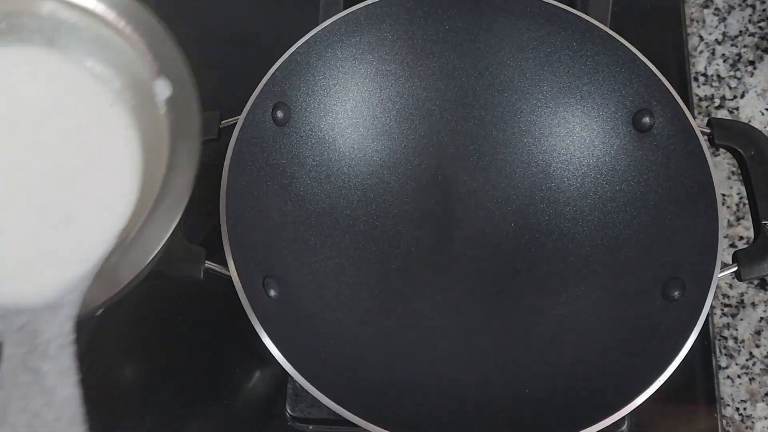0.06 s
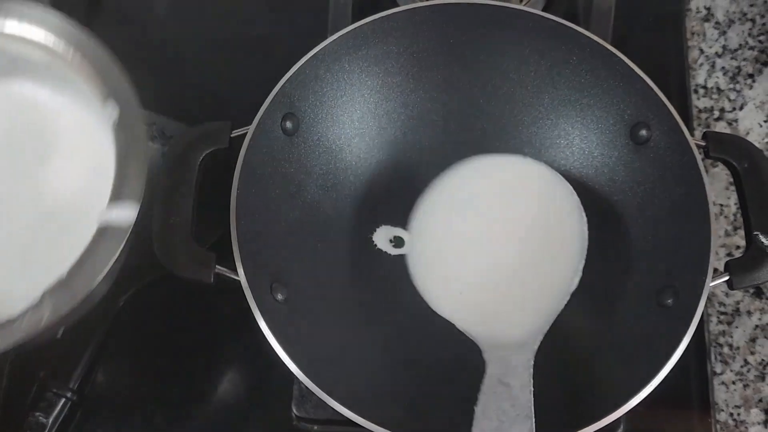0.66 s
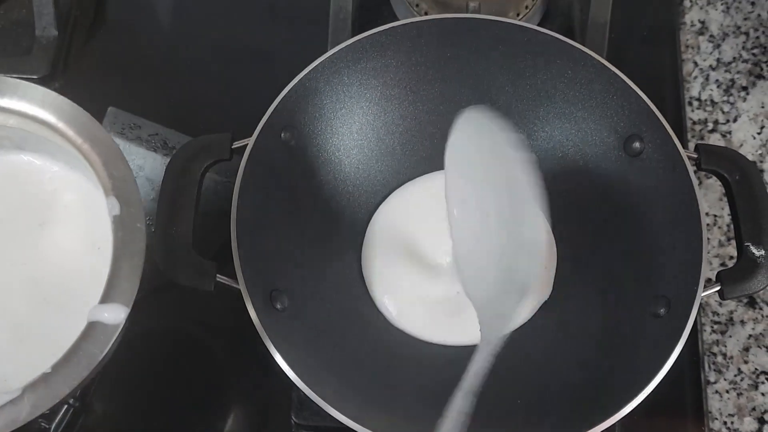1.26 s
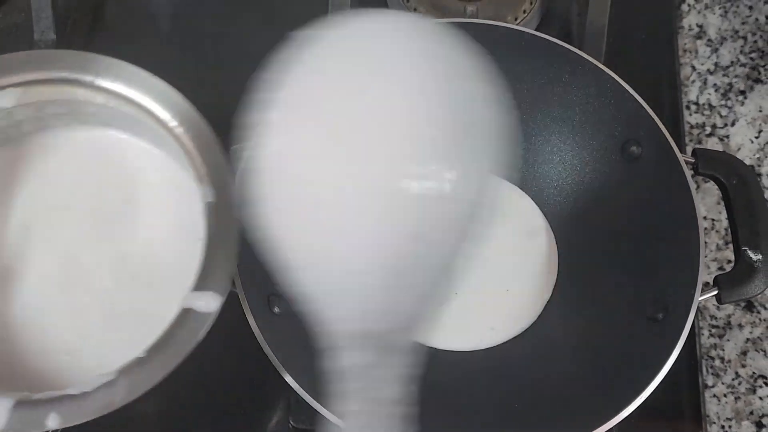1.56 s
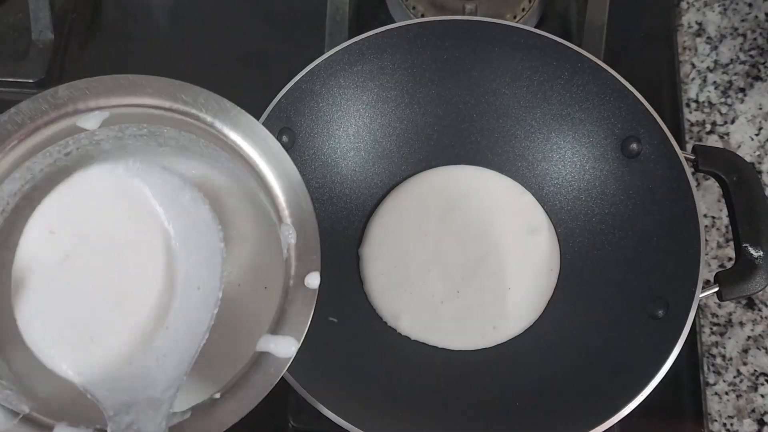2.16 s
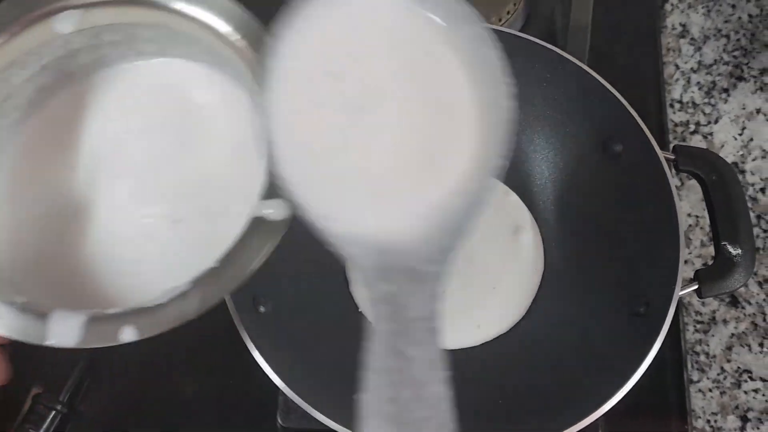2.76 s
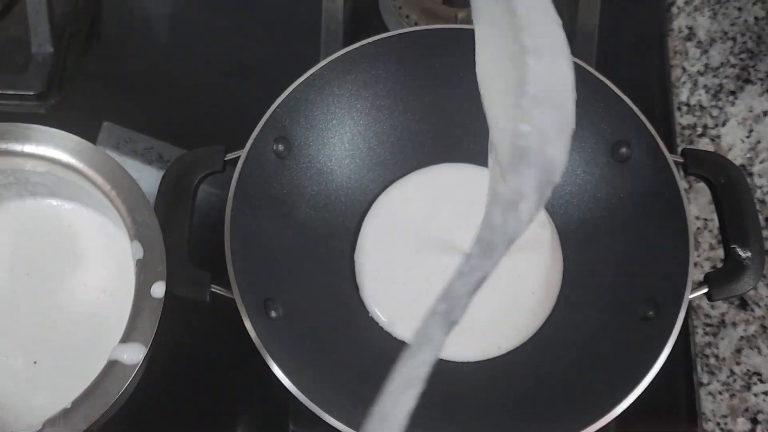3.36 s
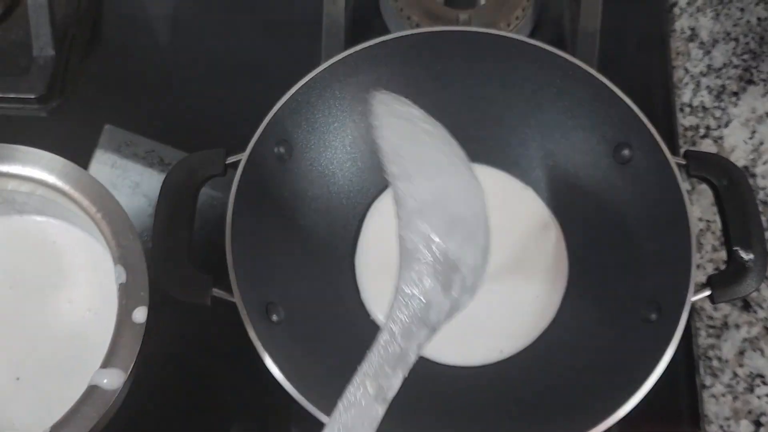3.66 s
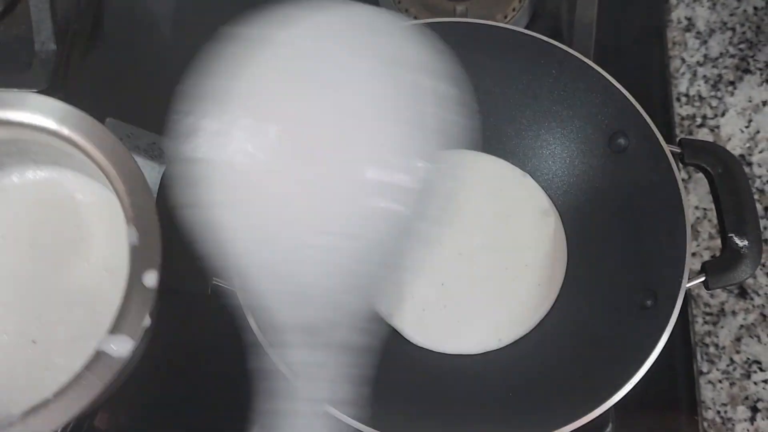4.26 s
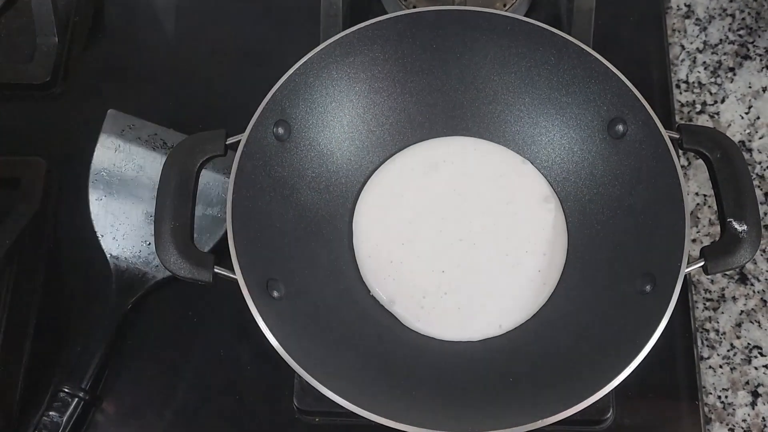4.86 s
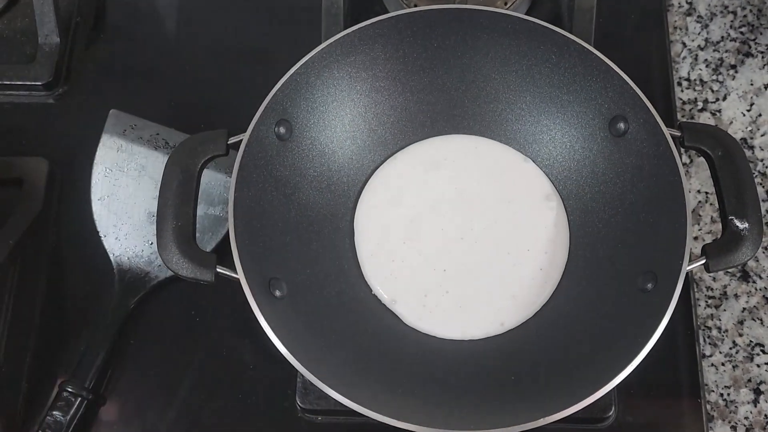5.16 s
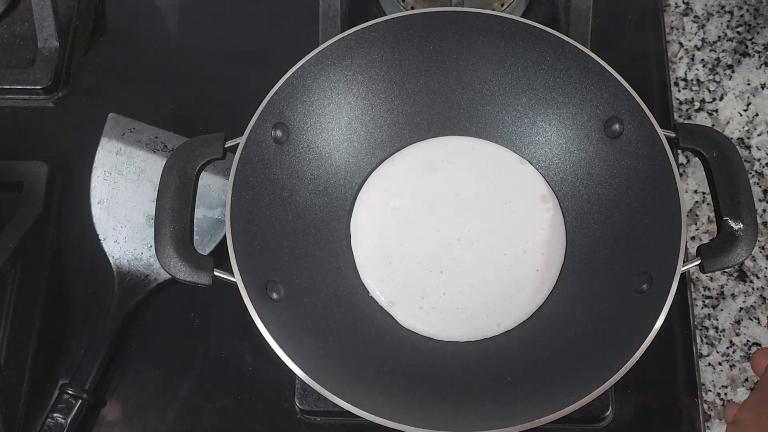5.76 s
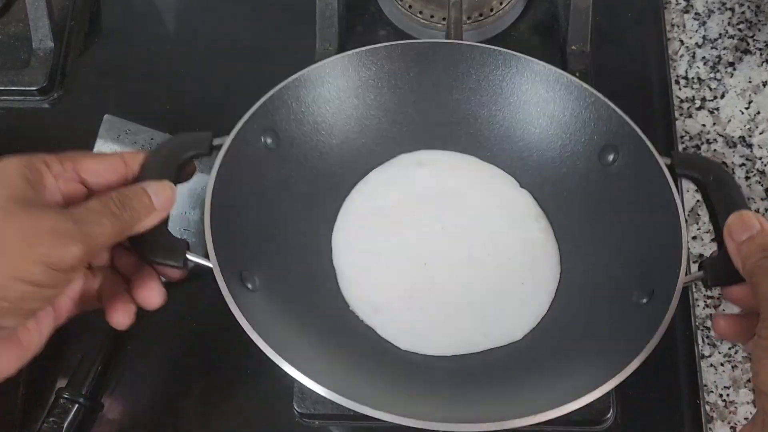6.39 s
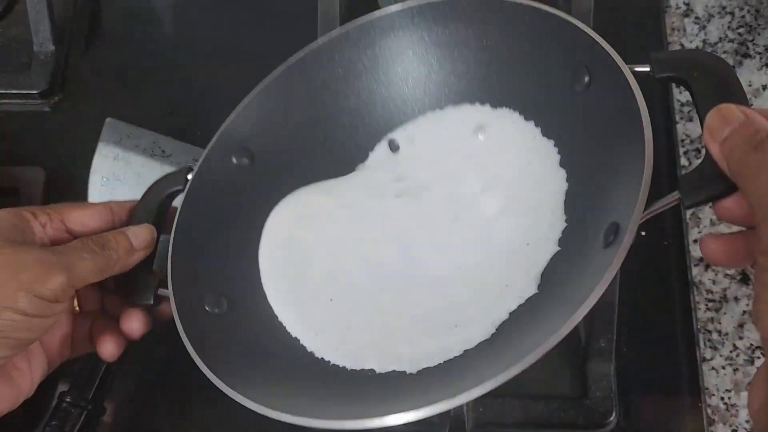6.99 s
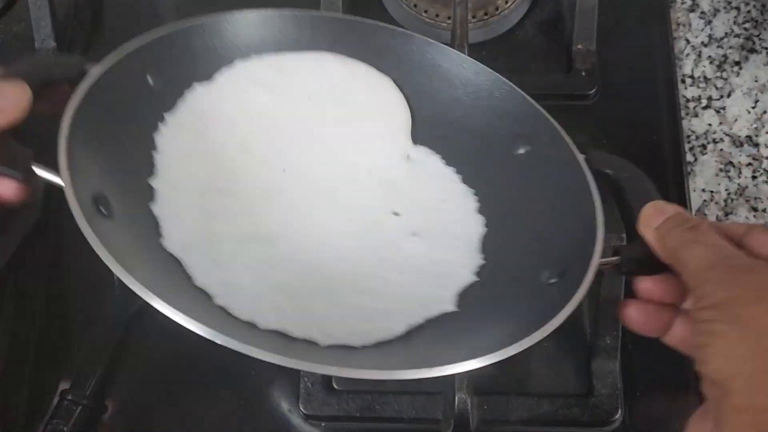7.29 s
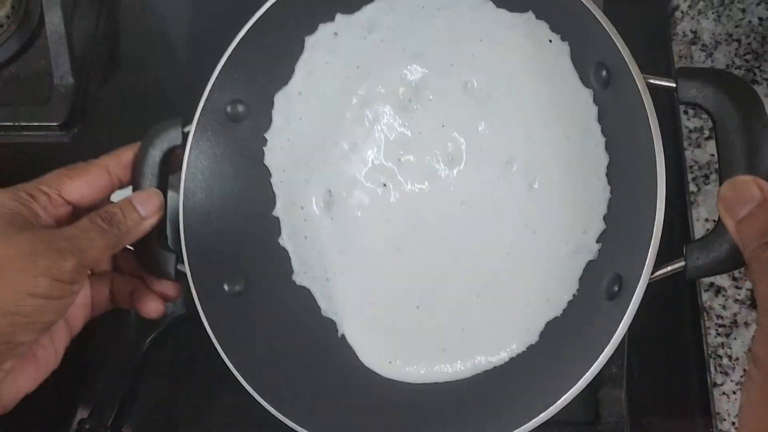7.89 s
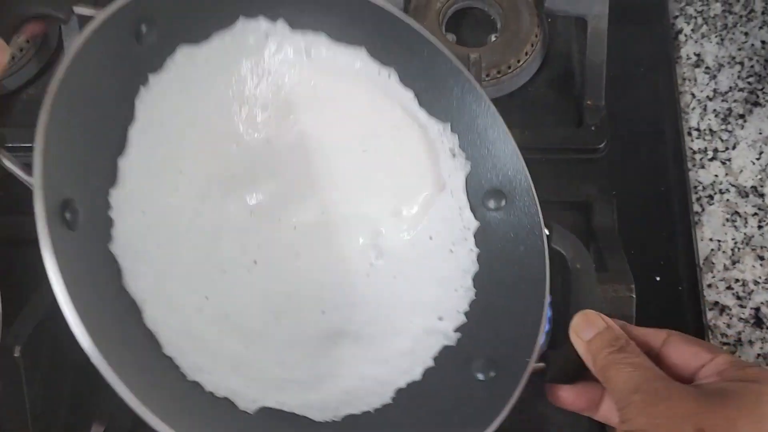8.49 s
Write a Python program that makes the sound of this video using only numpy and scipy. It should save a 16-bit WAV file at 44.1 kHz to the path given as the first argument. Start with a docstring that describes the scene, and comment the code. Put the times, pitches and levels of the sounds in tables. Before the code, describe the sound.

Batter sizzles as it is ladled twice into a hot pan and swirled, with a few pot knocks in between.

```python
"""Batter in a hot pan

Batter is ladled in twice, then swirled round. Each time it meets hot metal it boils, fine bubbles
first and larger ones later, and dies down as the underside sets. In between, single bubbles crackle
and the batter pot knocks on the counter, grit ticking under it. Handling bumps the stove top;
a gas burner murmurs underneath. A small kitchen, heard from just above the pan."""
import sys
import numpy as np
from scipy import signal
from scipy.fft import rfft, irfft, next_fast_len
from scipy.io import wavfile
from scipy.ndimage import uniform_filter1d, map_coordinates

SR = 44100
rng = np.random.default_rng(int(sys.argv[2]) if len(sys.argv) > 2 else 0)


def wav_out(sig):
    """Save sig, one row per channel (or a flat mono array), as 16-bit PCM at SR to the path in sys.argv[1]."""
    wavfile.write(sys.argv[1], SR, np.round(np.clip(np.atleast_2d(sig).T, -1, 1) * 32767).astype(np.int16))


N = 376173


# Bursting bubbles, one spectrum per size: freq_hz, density_db
FIZZ_SPECTRUM = [(5290, -29.5), (9000, -10), (9960, -9.5), (11700, 4.5), (13600, 0), (15100, 10.5),
                 (16000, -11)]
CRACKLE_SPECTRUM = [(1530, -31.5), (2600, -8.5), (3370, -1), (4000, 0), (5820, -7), (6290, -4.5),
                    (6800, -6), (7540, -1), (9000, -9), (11700, -13), (19800, -120)]
LARGE_SPECTRUM = [(800, -24), (980, -3.5), (1130, 5), (1230, 5), (1340, 2), (1440, -0.5), (1600, 4),
                  (1800, 3.5), (2000, 3.5), (2300, 6), (2600, -14), (2900, -15.5)]
GURGLE_SPECTRUM = [(250, -18), (400, -13.5), (550, -7.5), (670, -3), (760, -6), (850, -0.5), (980, -12),
                   (1150, -14.5)]
# Position of the wet edge: time_s, left_right_db
WET_EDGE = [(0.6, -5), (2.6, -7), (3.1, -4), (3.74, -6.5), (4.7, -5.5), (5.3, -11), (6.28, -4.5),
            (7.35, -5.5), (7.84, -5)]

def sizzle():
    """Fierce boiling merges bursts into a hiss; as the batter sets, single ones stand out."""
    boil, gurgle = boiling()
    bubbles = bursts(rate_per_s=200 + 24000 * boil / boil.max(), scatter_db=3)
    sputter_db = 0.7 * wobble(40) + 0.55 * wobble(9)
    fierce_db = 20 * np.log10(boil + 1e-5) + 33.5  # fiercer boiling is brighter
    fizz_db = grown_db(boil, delay_s=0.0017, growth_s=0.001) + 2.75 + 0.12 * fierce_db
    crackle_db = grown_db(boil, delay_s=0.00067, growth_s=0.0069) - 0.22
    large_db = grown_db(boil, delay_s=0.0033, growth_s=0.041) - 14
    gurgle_db = grown_db(gurgle, delay_s=0.096, growth_s=0.052) + 0.89

    def layer(spectrum, level_db, steam):
        """One bubble size: bursts over escaping steam."""
        gain = amp(level_db + sputter_db + 0.88 * wobble(18))
        return gain * spread(bubbles + steam * noise(), spectrum)

    hiss = (layer(FIZZ_SPECTRUM, fizz_db, steam=1.0)
            + layer(CRACKLE_SPECTRUM, crackle_db, steam=1.62)
            + layer(LARGE_SPECTRUM, large_db, steam=0.88)
            + layer(GURGLE_SPECTRUM, gurgle_db, steam=1.37))
    lean_db, = curves(WET_EDGE)
    return pan_ring(hiss + swells()) * balance(lean_db - lean_db.mean())


# Ladlefuls landing on hot metal: start_s, level_db, rise_s, spread_s, set_s, gurgle_rel_db
LADLEFULS = [(0.583, -32, 0.0068, 0.99, 0.057, -10.5), (3.148, -36.5, 0.016, 0.32, 0.17, -21.5)]
# Batter tilted over fresh metal: time_s, level_db, gurgle_rel_db
PAN_SWIRL = [(6.27, -76, -30), (6.32, -53, -40), (6.44, -39, -33), (6.56, -40, -29), (6.91, -36, -27),
             (7.06, -38.5, -17), (7.19, -37.5, -18), (7.42, -42, -31), (7.72, -44, -23.5), (8.06, -46, -19),
             (8.29, -44.5, -44), (8.46, -52, -29)]

def boiling():
    """Strength of the boil and of the gurgle under the thick middle, from pours and swirl."""
    cool_db_per_s, dry_db_per_s, thicken_db_per_s = 3, 8, 9.5
    t = np.arange(N) / SR
    swirl_db, swirl_gurgle_db = curves(PAN_SWIRL)
    swirl = (t > PAN_SWIRL[0][0]) * amp(swirl_db)
    boil_power, gurgle_power = swirl ** 2, (swirl * amp(swirl_gurgle_db)) ** 2
    for start_s, level_db, rise_s, spread_s, set_s, gurgle_rel_db in LADLEFULS:
        age_s = np.maximum(t - start_s, 0)
        setting_s = np.maximum(age_s - spread_s, 0)
        attack = 0.5 + 0.5 * np.tanh((t - start_s) / (2 * rise_s))
        hold = amp(level_db - cool_db_per_s * np.minimum(age_s, spread_s))
        release = (1 + setting_s / set_s) ** -0.77 * amp(-dry_db_per_s * setting_s)
        pour = attack * hold * release
        boil_power += pour ** 2
        gurgle_power += (pour * amp(gurgle_rel_db - thicken_db_per_s * age_s)) ** 2
    return np.sqrt(boil_power), np.sqrt(gurgle_power)


def bursts(rate_per_s, scatter_db):
    """Random bubble bursts of uneven size, at constant mean power."""
    chance = np.clip(rate_per_s / SR, 1e-5, 1)
    sizes = amp(scatter_db * np.clip(rng.standard_normal(N), -2, 2))
    hits = rng.random(N) < chance
    return unit(hits * sizes / np.sqrt(chance) * noise())


def grown_db(strength, delay_s, growth_s):
    """Bubbles take time to grow, so their level lags the boil."""
    t = np.arange(N) / SR
    delayed = np.interp(t - delay_s, t, strength)
    pole = np.exp(-1 / (SR * growth_s))
    return 20 * np.log10(signal.lfilter([1 - pole], [1, -pole], delayed) + 1e-9)


# Bubble crowds on the running edge: centre_s, sigma_s, level_db, pitch_hz, fall_oct_per_s, width_ratio
BUBBLE_CROWDS = [(0.607, 0.016, -33, 7100, 0, 0.08), (0.70, 0.037, -38, 2420, 2.5, 0.2),
                 (0.734, 0.06, -45, 1286, 1.5, 0.18), (7.262, 0.14, -41, 3500, 0.75, 0.16),
                 (7.582, 0.16, -58, 878, 0.3, 0.14), (7.818, 0.075, -49.5, 2965, 1, 0.09),
                 (8.171, 0.09, -53, 2130, -1, 0.08)]

def swells():
    """Bubbles of like size swell together, gliding in pitch as they grow."""
    track, t = np.zeros((2, N)), np.arange(-SR // 4, SR // 4) / SR
    for centre_s, sigma_s, level_db, pitch_hz, fall_oct_per_s, width_ratio in BUBBLE_CROWDS:
        lowpass = signal.butter(2, width_ratio * pitch_hz, fs=SR, output="sos")
        in_phase, quadrature = signal.sosfilt(lowpass, rng.standard_normal((2, 2, len(t))))
        phase = 2 * np.pi * np.cumsum(pitch_hz * 2 ** (-fall_oct_per_s * t)) / SR
        crowd = unit(in_phase * np.cos(phase) + quadrature * np.sin(phase))
        add(track, centre_s + t[0], amp(level_db) * np.exp(-0.5 * (t / sigma_s) ** 2) * crowd)
    return track


# Pan resonances: centre_hz, width_hz, lift_db
PAN_RESONANCES = [(672, 16, 3), (1118, 50, 7), (1237, 57, 4.5), (1450, 24, 10), (1803, 38, 7.5),
                  (3220, 22, -4), (4150, 24, 6), (4590, 62, 4.5), (6350, 72, 7), (6900, 65, 4.5),
                  (7430, 66, 4), (12340, 110, 7)]

def pan_ring(hiss, echo_s=0.005, echo_db=-17):
    """The pan rings faintly; its sides and the stove throw the hiss back, making it metallic."""
    def resonances(hz):
        return amp(sum(lift_db / (1 + (2 * (hz - centre_hz) / width_hz) ** 2)
                       for centre_hz, width_hz, lift_db in PAN_RESONANCES))

    direct = filtered(hiss, resonances)
    paths = np.zeros((2, SR // 50))
    paths[:, 0] = 1
    for ear in paths:
        delays_s = echo_s * rng.uniform(0.5, 1, size=4)
        ear[(delays_s * SR).astype(int)] = amp(echo_db) * rng.choice([-1, 1], size=4)
    return signal.fftconvolve(direct, paths / np.linalg.norm(paths[0]), axes=1)[:, :N]


def patchy(hiss, depth_db):
    """Bubbles of one size gather and disperse: shifting patches in the hiss, weaker in the treble."""
    hz, _, bins = signal.stft(hiss, SR, nperseg=512)
    across_bands = uniform_filter1d(rng.standard_normal(bins.shape[1:]), size=5, axis=0)
    patches = unit(uniform_filter1d(across_bands, size=14, axis=1))
    gain = amp(depth_db * patches / (1 + hz[:, None] / 8000))
    return signal.istft(bins * gain, SR, nperseg=512)[1][:, :N]


# Bubble pops and, at 5.6-5.76 s, duller grit ticks: start_s, level_db, t60_s, treble_db
POPS_AND_GRIT = [(2.105, -28.5, 0.0071, 2), (2.179, -30, .037, 1), (2.916, -36.5, 0.01, 0),
                 (3.039, -37.5, .01, 0), (3.115, -38.5, 0.014, 8), (5.113, -39.5, .03, 0),
                 (5.141, -41, 0.026, 5), (5.192, -30, .017, -4), (5.245, -37, .011, -1),
                 (5.335, -34, 0.042, -5.5), (5.382, -36.5, 0.021, 1.5), (5.574, -31, 0.0056, 0.5),
                 (5.613, -27.5, 0.046, -7), (5.627, -24, 0.042, -12), (5.664, -28, 0.13, -13),
                 (5.735, -29.5, 0.081, -11), (5.953, -34, 0.05, 0), (6.014, -41.5, 0.025, 4),
                 (6.108, -40.5, 0.02, 8), (6.18, -42, .09, 2), (6.301, -35, .035, 3)]

def pops_and_grit(rise_share=0.15):
    """Bubbles pop and spit; grit ticks and scrapes under the pot as it is set down."""
    snap, treble, t = np.zeros((2, N)), np.zeros((2, N)), np.arange(SR // 8) / SR
    stray_pops = [(start_s, level_db, 0.02, 2)
                  for start_s, level_db in rng.uniform((1.8, -51), (6.2, -43), size=(44, 2))]
    for start_s, level_db, t60_s, treble_db in POPS_AND_GRIT + stray_pops:
        grains = noise(len(t)) * amp(2 * rng.standard_normal(len(t)))
        burst = amp(level_db) * strike(t, t60_s, rise_s=rise_share * t60_s) * grains
        add(snap, start_s, burst)
        add(treble, start_s, amp(treble_db) * burst)
    # freq_hz, gain_db
    snap_colour = [(600, -7), (1200, -13.5), (2300, -7.5), (3200, 2.5), (4200, 4.5), (5600, -7),
                   (8000, -16), (15000, -44)]
    treble_colour = [(3000, -44), (5600, -5.5), (7500, 3), (9800, -2.5), (12000, 5.5), (15000, 6.5)]
    direct = filtered(snap, lambda hz: amp(along(snap_colour, hz)))
    direct += filtered(treble, lambda hz: amp(along(treble_colour, hz)))
    return direct + amp(-7.5) * kitchen(direct)


# The pot is bumped, set down and rocks: start_s, counter_db, pot_db, lowpass_hz
POT_KNOCKS = [(2.0, -44, -47, 1400), (2.019, -52, -66, 400), (4.622, -32, -25.5, 1050),
              (4.7531, -38, -30.5, 3320), (4.765, -39, -43, 3020), (5.668, -20.5, -64, 680),
              (5.722, -33, -62, 620), (5.731, -25.5, -55, 586), (5.760, -32, -43, 706),
              (5.786, -37.5, -63, 600), (5.858, -55, -59, 600)]
# Modes of the filled steel pot and the hollow counter: pitch_hz, level_db, t60_s
POT_MODES = [(170.4, -15, 0.29), (236, -1, .15), (260, -3, 0.18), (334, -4.5, 0.13), (383.4, 0, .16),
             (468, -12.5, .14), (535, -19, 0.17), (707, -16.5, 0.32), (973, -15.5, 0.14), (1075, -19, 0.22),
             (1137, 0.5, 0.028), (2120, -13, .05), (2950, -18, 0.09)]
COUNTER_MODES = [(101.2, -23.5, 0.77), (140, -16.5, 0.2), (173, -3, 0.075), (265, -21, 0.11),
                 (272, -1.5, 0.1), (296, 0.5, 0.12), (354, -20, 0.55), (510, -6, 0.058), (554, -24, 0.16),
                 (592, -12.5, 0.14), (663, -22, 0.041), (1180, -6, 0.063)]
# Crowded upper pot modes: freq_hz, density_db
CLATTER_SPECTRUM = [(400, -48), (700, -1), (870, -3), (1100, -6), (1500, 0), (1950, -6), (2250, -17),
                    (2550, -8), (2950, -5), (3300, -17), (5000, -30)]

def knocks():
    """Each blow rings pot and counter; a soft contact leaves out the high modes."""
    track, t = np.zeros((2, N)), np.arange(SR // 2) / SR
    clatter = spread(noise(), CLATTER_SPECTRUM)
    clack = strike(t, t60_s=0.021, rise_s=0.00061)
    afterring = amp(-14) * strike(t, t60_s=0.3, rise_s=0.00061)
    for start_s, counter_db, pot_db, lowpass_hz in POT_KNOCKS:
        upper_modes = (clack + afterring) * clatter[:, round(start_s * SR):][:, :len(t)]
        pot = ring(POT_MODES, t, rise_cycles=0.28) + amp(-2) * upper_modes
        counter = ring(COUNTER_MODES, t, rise_cycles=0.34)
        contact = signal.butter(4, lowpass_hz, fs=SR, output="sos")
        add(track, start_s, signal.sosfilt(contact, amp(counter_db) * counter + amp(pot_db) * pot))
    return track + amp(-8.5) * kitchen(track.mean(axis=0))


def ring(modes, t, rise_cycles):
    """A struck body: modes build up within about a cycle; high ones differ in phase left and right."""
    pitch_hz, level_db, t60_s = np.transpose(modes)[:, :, None]
    phase = rng.standard_normal((2, len(modes), 1)) * np.minimum(pitch_hz / 500, 2)
    gain = amp(level_db + rng.standard_normal(pitch_hz.shape))
    envelope = gain * strike(t, t60_s, rise_s=rise_cycles / pitch_hz)
    return (envelope * np.sin(2 * np.pi * pitch_hz * t + phase)).sum(axis=1)


# Ladle and pan handling: start_s, level_db, pitch_hz
HANDLING_BUMPS = [(0.728, -43.5, 93.6), (1.149, -45, 78), (1.299, -45, 89), (2.355, -38, 96.3),
                  (2.903, -42, 59.7), (3.266, -36.5, 134.3), (3.281, -30, 64.6), (3.373, -41.5, 89.5),
                  (3.691, -40, 105.4), (4.579, -37, 128), (4.94, -43, 94), (5.033, -49, 92),
                  (6.341, -42.5, 91.4), (6.429, -45, 92.4), (6.785, -39.5, 94), (6.86, -49, 89),
                  (7.07, -38, 90.7), (8.28, -44, 88)]
# Loose stove top: freq_hz, density_db
STOVE_SPECTRUM = [(25, -25), (45, -6), (95, 2), (165, -6), (230, -17), (400, -22), (800, -40)]

def bumps():
    """Soft pushes sway the stove top at a low, unsteady pitch; its loose parts rumble."""
    sway, shaking, t = np.zeros(N), np.zeros(N), np.arange(SR // 2) / SR
    push = strike(t, t60_s=0.25, rise_s=0.01)
    for start_s, level_db, pitch_hz in HANDLING_BUMPS:
        drift_rad = 7 * np.cumsum(rng.standard_normal(len(t))) / np.sqrt(SR)
        phase = 2 * np.pi * pitch_hz * t + uniform_filter1d(drift_rad, size=400)
        add(sway, start_s, amp(level_db) * push * np.sin(phase))
        add(shaking, start_s, amp(level_db) * push)
    rumble = amp(-9) * shaking * spread(noise(), STOVE_SPECTRUM)
    return sway + rumble + amp(-0.5) * kitchen(sway)


# Flame and room murmur: freq_hz, density_db
BURNER_SPECTRUM = [(15, -46), (25, -8), (45, -15.5), (75, -5.5), (110, -3.5), (165, -9.5), (210, -21),
                   (500, -21), (840, -24), (1370, -25.5), (2000, -21), (2760, -31), (4500, -23.5),
                   (5500, -30.5), (7000, -30), (10000, -34.5), (13000, -22.5), (15700, -39.5)]
# Flame rumble, quieter once the pan is lifted off: time_s, gain_db
FLAME_RUMBLE = [(0, 1.5), (2.5, 3), (4.2, 3.5), (6.3, 1.5), (7.2, -2), (7.6, -1), (8.53, -2.5)]

def burner():
    """The gas flame murmurs steadily; its low rumble flutters."""
    flame_db, = curves(FLAME_RUMBLE)
    murmur = amp(-59) * spread(noise(), BURNER_SPECTRUM)
    rumble = filtered(murmur, lambda hz: 1 / (1 + (hz / 450) ** 4))
    hiss = murmur - rumble
    return hiss + rumble * amp(flame_db + 2 * wobble(13))


# Kitchen reverberation: freq_hz, t60_s
KITCHEN_DECAY = [(100, 0.41), (400, 0.31), (2000, 0.39), (8000, 0.21), (15000, 0.21)]

def kitchen(x):
    """Wall reflections; each frequency dies at its own rate."""
    hz, t, bins = signal.stft(noise(SR // 2), SR, nperseg=256)
    decay = amp(-60 * t / along(KITCHEN_DECAY, hz)[:, None])
    tail = signal.istft(bins * decay, SR, nperseg=256)[1]
    tail[:, :SR // 200] = 0  # nearest wall: 5 ms
    mid, side = signal.fftconvolve(np.atleast_2d(x), tail / np.linalg.norm(tail[0]), axes=1)[:, :N]
    return np.array([mid + 0.12 * side, mid - 0.26 * side])


# Left-right likeness: freq_hz, correlation
STEREO_LIKENESS = [(100, 0.98), (250, 0.78), (500, 0.44), (1000, 0.24), (1900, 0.26), (3800, 0.12),
                   (15000, 0.041)]

def spread(pair, spectrum):
    """Colours two unrelated signals and blends them to stereo of rms 1: bass alike, treble apart."""
    def mid_side_gains(hz):
        angle = np.arccos(along(STEREO_LIKENESS, hz)) / 2
        return amp(along(spectrum, hz)) * [np.cos(angle), np.sin(angle)]

    mid, side = filtered(pair, mid_side_gains)
    return unit(np.array([mid + side, mid - side]))


def amp(db):
    return 10 ** (np.asarray(db) / 20)


def balance(left_right_db):
    return amp(np.array([[0.5], [-0.5]]) * left_right_db)


def unit(x):
    """Scaled to rms 1."""
    return x / np.sqrt(np.mean(x ** 2) + 1e-20)


def noise(samples=N):
    return rng.standard_normal((2, samples))


def strike(t, t60_s, rise_s):
    """Envelope with exponential rise and decay."""
    return amp(-60 * t / t60_s) * (1 - np.exp(-t / rise_s))


def along(points, hz):
    """Interpolates (freq_hz, value) points on a log axis."""
    freq_hz, values = np.transpose(points)
    return np.interp(np.log(hz + 1), np.log(freq_hz + 1), values)


def curves(rows):
    """One value per sample for each column after time_s."""
    time_s, *columns = np.transpose(rows)
    return [np.interp(np.arange(N) / SR, time_s, column) for column in columns]


def wobble(knots_per_s):
    """A smooth random curve."""
    knots = rng.standard_normal(int(N * knots_per_s / SR) + 4)
    return map_coordinates(knots, [np.arange(N) * knots_per_s / SR], order=2)


def filtered(x, response):
    """Applies the gain response(hz)."""
    size = next_fast_len(N + 8192)
    return irfft(rfft(x, size) * response(np.fft.rfftfreq(size, 1 / SR)), size)[..., :N]


def add(track, start_s, sound):
    part = track[..., round(start_s * SR):][..., :sound.shape[-1]]
    part += sound[..., :part.shape[-1]]


def scene():
    """Everything on and around the stove."""
    return patchy(sizzle(), depth_db=1.9) + pops_and_grit() + knocks() + bumps() + burner()


# Colour difference of the two microphone ports: freq_hz, left_right_db
PORT_BALANCE = [(100, 0.2), (330, 3.5), (700, 0.5), (1500, 3), (2700, -0.5), (4100, -7.5), (4900, -3),
                (5600, 13.5), (6400, 2.5), (7400, 1), (9300, 0.5), (11400, -6.5), (13800, -4.5),
                (15400, -7)]

def record(dry, top_hz=15900):
    """Each port colours its side at constant total power, under a steep band limit."""
    def response(hz):
        gains = balance(along(PORT_BALANCE, hz))
        gains /= np.sqrt(np.mean(gains ** 2, axis=0))
        return gains / (1 + (hz / top_hz) ** 400)

    return filtered(dry, response)


dry = scene()
out = record(dry)
wav_out(out)
```